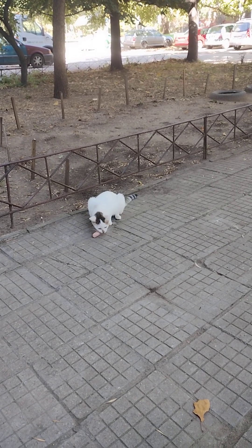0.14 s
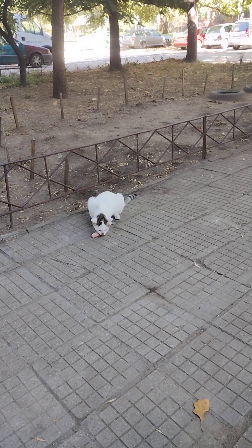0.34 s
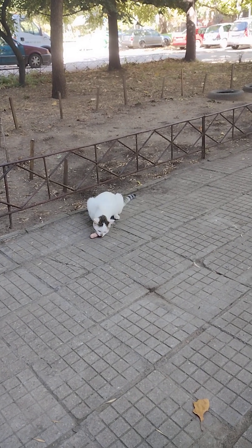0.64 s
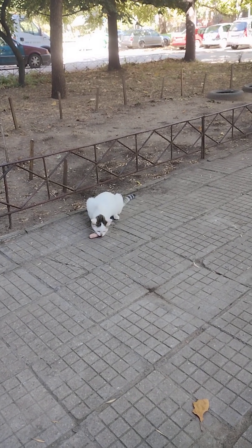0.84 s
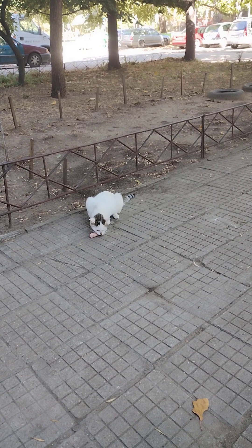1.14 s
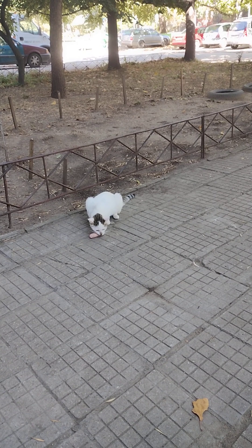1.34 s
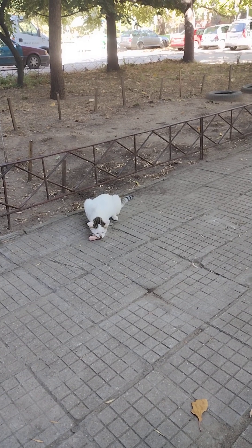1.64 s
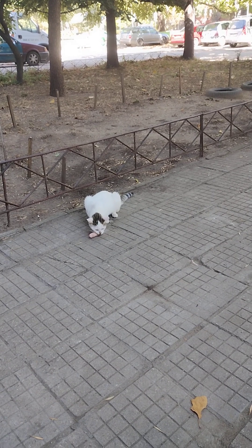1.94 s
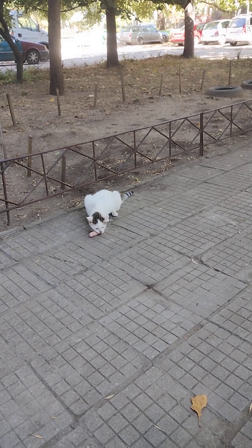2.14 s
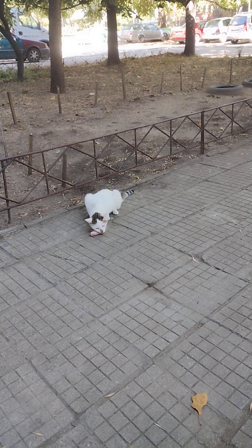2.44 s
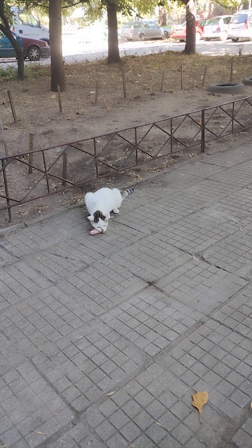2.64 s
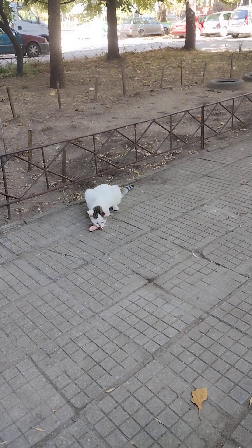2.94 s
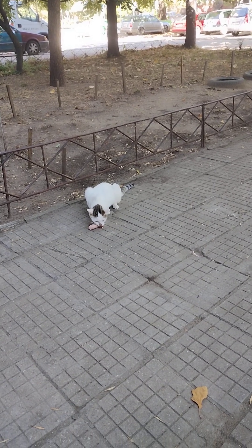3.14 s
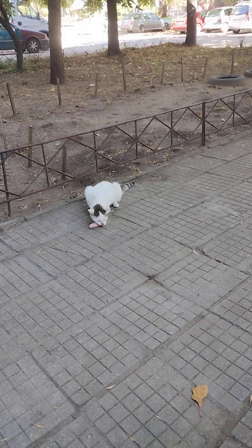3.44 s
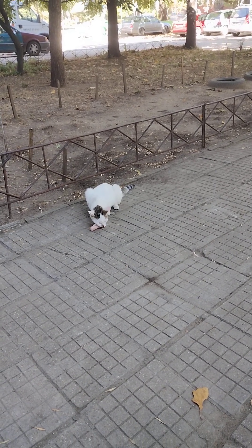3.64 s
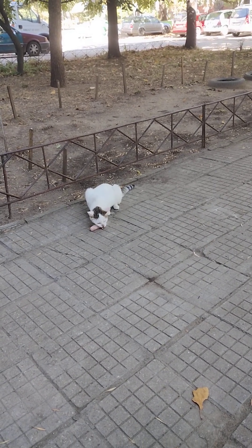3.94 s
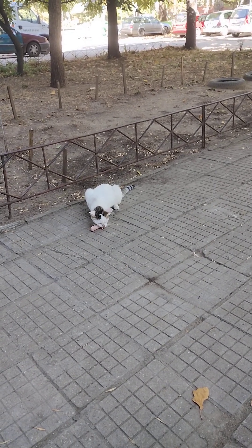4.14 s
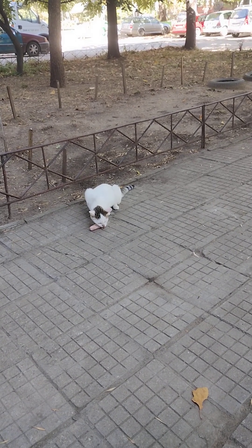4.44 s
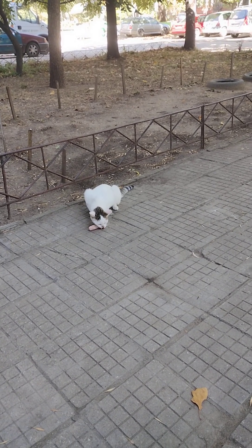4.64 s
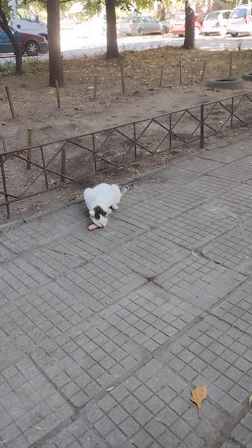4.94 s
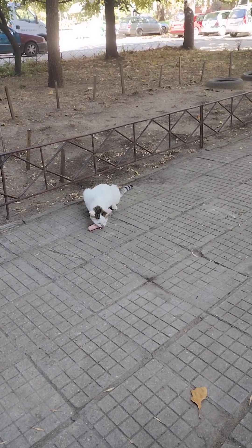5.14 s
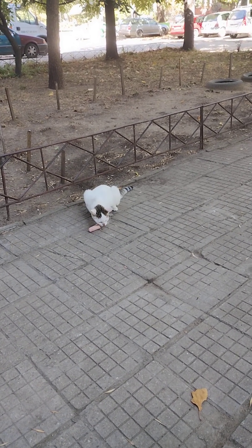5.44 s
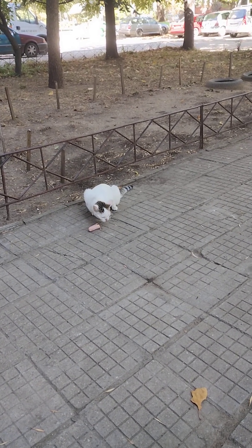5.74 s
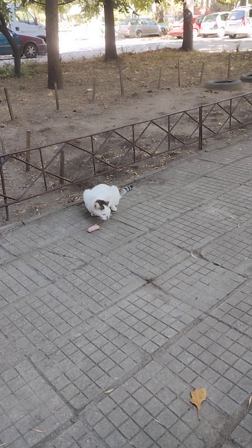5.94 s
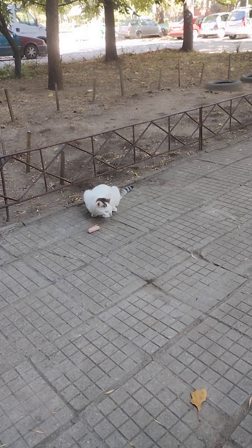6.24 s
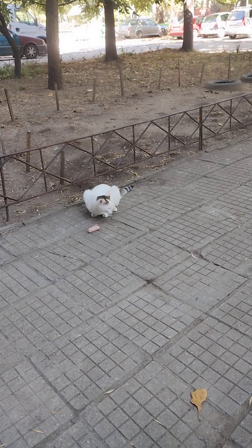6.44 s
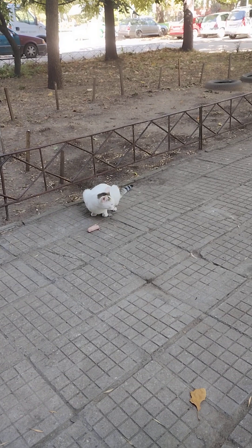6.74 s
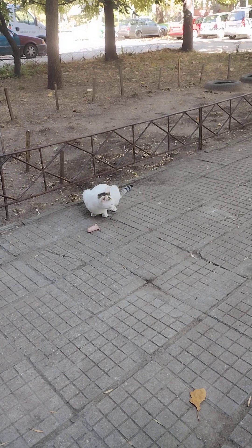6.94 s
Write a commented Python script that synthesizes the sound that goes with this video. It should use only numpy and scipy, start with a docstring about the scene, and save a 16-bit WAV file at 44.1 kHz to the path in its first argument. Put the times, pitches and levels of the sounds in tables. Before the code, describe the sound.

A city street heard outdoors from a pavement at some distance, in stereo, with constant low traffic rumble and soft tyre roar slightly to the right. At 0-0.45 s four quick raspy bird chirps sound, blurred by echo, while a far fluttering engine slows and dies away. A very faint tick comes near 1 s. From about 1.1 s a vehicle pulls away in one gear, its deep exhaust boom rising steadily and swelling through resonances until 5.4 s. A thin, faint falling whistle comes at 2.2 s and two close dull knocks at 2.6 s. From 3.3 s a second engine throbs softly. The first turns raspy and swishes past around 5.3 s, then fades. The second gathers speed, throbbing faster, with a thin whine near 6 s and rising tyre hiss to the end at about 7 s. Dry ticks click at 6.05-6.15 s; a stronger dull knock and gritty scuff land at 6.5 s.

```python
"""A city street heard from a pavement some way off, over steady traffic rumble and tyre roar.
Raspy bird chirps open it as a far engine dies away. One vehicle pulls away in one gear, its exhaust
harmonics booming through resonances; a thin whistle and two dull knocks fall meanwhile. A second engine
throbs in, the first rasps and swishes by, then the second gathers speed with a whine and rising hiss.
Dry ticks, a last knock and a gritty scuff come near the end. Noise is filtered, engines are harmonics."""
import sys
import numpy as np
from scipy import signal
from scipy.fft import rfft, irfft
from scipy.io import wavfile

SR = 44100
rng = np.random.default_rng(int(sys.argv[2]) if len(sys.argv) > 2 else 0)


def file_out(sig):
    """Save sig as 16-bit WAV at sys.argv[1]."""
    # one column per channel
    cols = np.atleast_2d(sig).T
    # limit, then scale
    lim = np.clip(cols, -1, 1)
    pcm = np.round(lim * 32767).astype(np.int16)
    wavfile.write(sys.argv[1], SR, pcm)


N = 313110
TIME = np.arange(N) / SR
FREQS = np.fft.rfftfreq(N, 1 / SR)


def undb(db):
    """Decibels to gain."""
    return 10 ** (np.asarray(db) / 20)


def unit(x):
    """Scale to rms 1."""
    return x / np.sqrt(np.mean(x ** 2))


def curves(table):
    """Columns of a table, joined by straight lines in time."""
    s, *columns = np.transpose(table)
    return [np.interp(TIME, s, c) for c in columns]


def colour(points, hz=FREQS):
    """Gain of a spectrum at the given frequencies, in dB over log frequency."""
    f, db = np.transpose(points)
    return undb(np.interp(np.log(hz + 1), np.log(f), db))


def walk(rate_hz):
    """Smooth random curve of rms 1 that changes at about this rate."""
    low_pass = 1 / (1 + (FREQS / rate_hz) ** 4)
    return unit(irfft(rfft(rng.standard_normal(N)) * low_pass, N))


def swell(start_s, end_s, db, rise_db_per_s=0, fall_db_per_s=0):
    """Gain that climbs to its level, holds from start to end and dies away."""
    below_db = rise_db_per_s * np.maximum(start_s - TIME, 0)
    past_db = fall_db_per_s * np.maximum(TIME - end_s, 0)
    return undb(db - below_db - past_db)


def pan(x, left_db):
    """Place a sound by its left minus right level."""
    return x * undb(np.array([[left_db], [-left_db]]) / 2)


def noise(points, alike_hz, gate=1):
    """Gated, then coloured stereo noise of rms 1; ports are alike well below alike_hz, unrelated above."""
    mid, side = rfft(gate * rng.standard_normal((2, N)))
    alike = np.exp(-(FREQS / alike_hz) ** 2)
    both = np.sqrt(1 + alike) * mid + np.sqrt(1 - alike) * side * np.array([[1], [-1]])
    return unit(irfft(both * colour(points), N))


def street(x, t60_s, wet_db):
    """Direct sound plus diffuse echoes from house fronts and trees, as decaying noise."""
    tail = rng.standard_normal((2, SR)) * undb(-60 * TIME[:SR] / t60_s)
    tail /= np.sqrt(np.sum(tail ** 2, axis=1, keepdims=True))
    wet = signal.fftconvolve(x[None], tail, axes=1)[:, :N]
    return (x + undb(wet_db) * wet) / np.sqrt(1 + undb(2 * wet_db))


def turn(hz, jitter):
    """Firing phase of an engine whose speed is slightly unsteady."""
    return 2 * np.pi * np.cumsum(hz * (1 + jitter * walk(12.5))) / SR


def harmonic(phase, order, flutter, flutter_hz=9):
    """A line locked to the phase, steady part of rms 1; scattered paths make it flutter."""
    scatter = 1 + flutter * (walk(flutter_hz) + 1j * walk(flutter_hz))
    return np.sqrt(2) * np.real(scatter * np.exp(1j * order * phase))


def engine(speed, orders, flutter):
    """An engine of rms 1: fluttering harmonics of its firing rate."""
    phase = turn(curves(speed)[0], jitter=0.01111)
    return unit(sum(undb(db) * harmonic(phase, k, flutter) for k, db in orders))


# spectra of far rumble, tyre roar, far engine's tyres: (frequency [Hz], level [dB])
RUMBLE_COLOUR = [(20, -30.5), (32, -35), (46, -6.5), (70, 1), (100, 1.5), (170, 0.5), (215, -4),
                 (260, -4.5), (340, -9.5), (480, -15.5), (700, -27.5), (1500, -55)]
ROAR_COLOUR = [(100, -21), (300, -9), (500, -4.5), (700, -5), (950, 0), (1300, -1.5), (1600, -2),
               (2200, -7), (2800, -13.5), (3400, -22), (5000, -30.5), (8000, -39), (11000, -57.5),
               (14000, -62)]
LEAVING_COLOUR = [(300, -16), (550, -8), (780, 4), (1100, -1.5), (2200, -8.5), (3200, -24.5), (4700, -30.5),
                  (8000, -40), (14000, -49)]
# rumble: (time [s], level [dB])
RUMBLE_LEVEL = [(0, -36), (1.2, -36), (2.8, -39.5), (4.5, -34), (5.6, -39), (7.1, -35)]
# swell of the far engine's tyres: hold [s], level [dB], fall [dB/s]
LEAVING_SWELL = dict(start_s=0, end_s=0.17, db=-43, fall_db_per_s=7)


def traffic():
    """Many far engines merge to a rumble, tyres to a slowly ebbing roar further to the right."""
    rumble_db = curves(RUMBLE_LEVEL)[0] + 0.29 * walk(3.6)
    rumble = noise(RUMBLE_COLOUR, alike_hz=1490) * undb(rumble_db)
    roar_start_db, ebb_db_per_s = -41, 0.14
    roar_db = roar_start_db - ebb_db_per_s * TIME + 0.44 * walk(26.0)
    roar = noise(ROAR_COLOUR, alike_hz=920) * undb(roar_db)
    leaving = noise(LEAVING_COLOUR, alike_hz=900) * swell(**LEAVING_SWELL)
    return pan(rumble, left_db=-2.05) + pan(roar + leaving, left_db=-3.5)


# far engine, slowing: (time [s], firing rate [Hz])
DRONE_SPEED = [(0, 64.3), (.8, 60.8)]
# its harmonics: (multiple of firing rate, relative level [dB])
DRONE_ORDERS = [(1, 0.5), (2, -9), (3, -12), (4, -5), (5, -14), (6, -15.5)]
# its swell: hold [s], level [dB], fall [dB/s]
DRONE_SWELL = dict(start_s=0, end_s=0.22, db=-36.5, fall_db_per_s=14)


def far_engine():
    """Strongly fluttering harmonics of a slowing engine die away."""
    return engine(DRONE_SPEED, DRONE_ORDERS, flutter=0.97) * swell(**DRONE_SWELL)


def arch(s, length_s):
    """Rounded envelope of one bird note."""
    return np.sqrt(np.maximum(0, 1 - (2 * (TIME - s) / length_s - 1) ** 2))


# raspy chirps: (time [s], length [s], level [dB])
CHIRPS = [(0.04, 0.11, -57), (0.205, 0.075, -55), (0.29, 0.055, -61), (0.363, 0.086, -53)]
# chirp spectrum: (frequency [Hz], level [dB])
CHIRP_COLOUR = [(2500, -21), (4000, -11), (4950, -3), (5300, -14), (5650, -3), (6000, -16), (6650, 3),
                (7080, -3.5), (7400, -22), (8300, -19), (9000, -23), (10800, -21), (14000, -44)]
# thin whistle: (time [s], pitch [Hz])
WHISTLE = [(2.22, 7800), (2.309, 7800), (2.42, 7200)]


def birds():
    """Chirps of gated noise and a falling sine whistle, blurred by the trees."""
    gate = sum(undb(db) * arch(s, length_s) for s, length_s, db in CHIRPS)
    chirps = street(noise(CHIRP_COLOUR, alike_hz=900)[0] * gate, t60_s=1.5, wet_db=5.5)
    start_s, end_s = WHISTLE[0][0], WHISTLE[-1][0]
    hz = curves(WHISTLE)[0] * (1 + 0.013 * walk(220))
    tone = np.sqrt(2) * np.sin(2 * np.pi * np.cumsum(hz) / SR)
    whistle = undb(-66.5) * arch(start_s, end_s - start_s) * tone
    return pan(chirps, left_db=-1.5) + pan(street(whistle, t60_s=1.3, wet_db=7), left_db=-0.5)


# dull knocks: (time [s], ring frequency [Hz], t60 [s], level [dB])
KNOCKS = [(2.593, 615, .1, -35.5), (2.618, 640, .14, -39), (6.486, 312, .1, -20.5)]
# panel modes: (multiple of ring frequency, relative level [dB])
KNOCK_MODES = [(.55, -13.5), (.8, -9.5), (.93, 0), (1.06, -0.5), (1.23, -9.5), (1.4, -16.5)]


def knocks():
    """Far, dull blows such as a car door: a soft contact rings a few low panel modes."""
    out = np.zeros(N)
    contact_s = 0.0038
    for s, hz, t60_s, db in KNOCKS:
        age = np.maximum(TIME - s, 0)
        ring = sum(undb(mode_db) * np.sin(2 * np.pi * hz * ratio * age) for ratio, mode_db in KNOCK_MODES)
        out += ring * (1 - np.exp(-age / contact_s)) * undb(db - 60 * age / t60_s)
    return street(out, t60_s=0.3, wet_db=-8.5)


# small sharp ticks: (time [s], pitch [Hz], t60 [s], level [dB])
TICKS = [(.981, 14000, .1, -63), (6.057, 1900, .04, -38.5), (6.080, 1600, .05, -43),
         (6.129, 1900, .05, -44), (6.5, 4300, .05, -52)]
# tick spectrum: (multiple of pitch, level [dB])
TICK_COLOUR = [(.3, -28), (.65, -6), (1, 0), (1.4, -7), (2.5, -40)]


def ticks():
    """Short dry noise bursts, as of a twig or leaf on the paving."""
    out = 0
    attack_s = .0015
    for s, hz, t60_s, db in TICKS:
        burst = noise([(hz * ratio, level_db) for ratio, level_db in TICK_COLOUR], alike_hz=9000)
        attack = np.clip((TIME - s) / attack_s, 0, 1)
        out = out + burst * attack * undb(db - 60 * abs(TIME - s) / t60_s)
    return out


def whine():
    """A thin, unsteady belt whine of rms 1 at one port."""
    hz = 3115 * (1 + .012 * walk(300) + .003 * walk(3))
    return unit(harmonic(2 * np.pi * np.cumsum(hz) / SR, order=1, flutter=0.26))


# spectra of first vehicle's tyres and air, second's tyres, gritty scuff: (frequency [Hz], level [dB])
PASS_COLOUR = [(1500, -13.5), (3000, 5.5), (3900, 1.5), (4650, 1), (5300, -6.5), (6100, -3), (6700, -6.5),
               (7400, -10), (8500, -8.5), (9100, -14), (9800, -10.5), (11000, -24), (14000, -31)]
NEAR_COLOUR = [(1500, -7), (2700, 5), (3200, 5.5), (3450, 3.5), (3750, 5.5), (4200, -5), (4650, -7),
               (5300, -6), (6100, -3.5), (7400, -19.5), (8200, -16.5), (9700, -17), (11000, -30.5),
               (14000, -28.5)]
SCUFF_COLOUR = [(2000, -3), (3300, 0), (3700, -1), (4000, -10), (4270, 5), (4700, -12), (5500, -7),
                (6100, -7), (7200, -22), (14000, -35)]
# swells of these and of the belt whine: hold [s], level [dB], rise and fall [dB/s]
PASS_SWELL = dict(start_s=5.29, end_s=5.32, db=-53, rise_db_per_s=9, fall_db_per_s=18)
NEAR_SWELL = dict(start_s=7.46, end_s=7.1, db=-48, rise_db_per_s=7.5)
SCUFF_SWELL = dict(start_s=6.48, end_s=6.7, db=-57.5, rise_db_per_s=300, fall_db_per_s=14)
WHINE_SWELL = dict(start_s=5.9, end_s=6.3, db=-59.5, rise_db_per_s=5.5, fall_db_per_s=6)


def hiss():
    """Tyre noise: the first vehicle swishes by; the second nears with a belt whine and a sudden scuff."""
    passing = noise(PASS_COLOUR, alike_hz=900) * swell(**PASS_SWELL) * undb(0.4 * walk(11))
    nearing = noise(NEAR_COLOUR, alike_hz=900) * swell(**NEAR_SWELL) * undb(walk(18))
    scuff = noise(SCUFF_COLOUR, alike_hz=900) * swell(**SCUFF_SWELL) * undb(2.5 * walk(35))
    belt = np.array([whine(), whine()]) * swell(**WHINE_SWELL)
    return pan(passing + nearing + scuff + belt, left_db=-2.5)


# coasting, then gathering speed: (time [s], firing rate [Hz], level [dB], throb rate [Hz])
SECOND_SPEED = [(3.3, 72.75, -50, 3.7), (4.2, 71.1, -43.5, 3.7), (5.3, 68.46, -46, 3.71),
                (6.1, 69, -39.5, 4.1), (6.5, 70.35, -36.5, 5.15), (7.1, 75.7, -37, 5.6)]
# its harmonics: (multiple of firing rate, relative level [dB])
SECOND_ORDERS = [(1, -9.5), (2, 2), (3, -25.5), (4, -7), (5, -24.5), (6, -16), (7, -23), (9, -21)]


def second_engine():
    """The second engine's harmonics throb, faster as it gathers speed."""
    _, db, throb_hz = curves(SECOND_SPEED)
    crest_s, depth = 6.01, .55
    cycles = np.cumsum(throb_hz) / SR
    from_crest = cycles - np.interp(crest_s, TIME, cycles)
    throb = 1 + depth * np.cos(2 * np.pi * from_crest)
    return engine(SECOND_SPEED, SECOND_ORDERS, flutter=0.22) * throb * undb(db)


# exhaust and street resonances: (centre [Hz], width [Hz], peak gain [dB])
BOOM_MODES = [(64.9, 4.3, -34.5), (70.3, 2.3, -33.5), (73, 1.5, -27), (76.3, 2.9, -24.5), (81.5, 3.33, -25),
              (84.35, 0.71, -32), (87.16, 1.2, -30), (92.5, 4.6, -35.5), (99.3, 3, -39),
              (126.5, 7.5, -36.5), (133.2, 4.7, -30), (138.9, 3.8, -30), (145.3, 4.1, -34.5),
              (163.5, 5.3, -34), (171.6, 1.8, -31), (174.14, 2.4, -22), (177.6, 1.5, -28.5),
              (181.2, 2.2, -23.5), (184, 2.2, -28), (187.9, 2.8, -30), (192.46, 3.27, -27),
              (198.7, 1.3, -35), (203.6, 7, -38.5), (210.1, 4, -38.5), (252.4, 18, -44.5)]


def resonance(hz):
    """Summed gain of the booming resonances for a line at this frequency."""
    return sum(undb(db) / (1 + (2 * (hz - centre) / width) ** 2) for centre, width, db in BOOM_MODES)


# first vehicle: (time [s], firing rate [Hz])
SPEED = [(1.0, 61.5), (1.6, 66.3), (2.8, 79.1), (4.0, 91.1), (5.5, 104.2)]
# spectra of exhaust rasp and load shudder: (frequency [Hz], level [dB])
RASP_COLOUR = [(150, -5.5), (260, -1.5), (300, -10.5), (345, -8.5), (385, 2), (420, -3), (465, -0.5),
               (560, -14.5), (800, -9)]
SHUDDER_COLOUR = [(15, -27), (32, -12), (46, 5), (60, 1.5), (120, 9.5), (180, 3.5), (260, -1.5),
                  (600, -53.5)]
# swells: hold [s], level [dB], rise and fall [dB/s]; throttle scales the whole boom
THROTTLE = dict(start_s=1.12, end_s=5.38, db=0, rise_db_per_s=70, fall_db_per_s=45)
THIRD_SWELL = dict(start_s=1.52, end_s=3.25, db=1.2, rise_db_per_s=55, fall_db_per_s=30)
FOURTH_SWELL = dict(start_s=1.6, end_s=1.64, db=-46.5, rise_db_per_s=70, fall_db_per_s=30)
SHUDDER_SWELL = dict(start_s=1.3, end_s=3.26, db=-35.5, rise_db_per_s=65, fall_db_per_s=5.5)
# rasp coming into the open, and its fade: the two gains multiply
RASP_SWELL = dict(start_s=4.83, end_s=4.94, db=-44, rise_db_per_s=4.5, fall_db_per_s=4.5)
RASP_FADE = dict(start_s=1.4, end_s=5.53, db=1, rise_db_per_s=72, fall_db_per_s=6)


def accelerating():
    """Exhaust harmonics boom across resonances, half orders rasp, gas puffs shudder with each firing."""
    hz = curves(SPEED)[0]
    phase = turn(hz, jitter=.002)
    first, second, third = (
        resonance(k * hz) * harmonic(phase, k, flutter=.09, flutter_hz=14) for k in (1, 2, 3))
    fourth = harmonic(phase, 4, flutter=0.57) * swell(**FOURTH_SWELL)
    boom = first + second + third * swell(**THIRD_SWELL) + fourth

    half_db = -1.5  # unequal cylinders sound between the firing harmonics
    rasp = 0
    for k in np.arange(5, 15) / 2:
        # the higher the order, the rougher and wider its line
        line = unit(harmonic(phase, k, flutter=.12 * k, flutter_hz=3 * k))
        rasp = rasp + undb(half_db * (2 * k % 2)) * colour(RASP_COLOUR, k * hz) * line
    rasp = unit(rasp) * swell(**RASP_FADE) * swell(**RASP_SWELL)

    puffs = 1 + .7 * np.sin(phase)
    shudder = noise(SHUDDER_COLOUR, alike_hz=1500, gate=puffs) * swell(**SHUDDER_SWELL)
    return swell(**THROTTLE) * boom + rasp + pan(shudder, left_db=-4.5)


def scene():
    """Everything that reaches the pavement."""
    background = traffic() + far_engine() + birds() + knocks() + ticks()
    return background + hiss() + second_engine() + accelerating()


# balance of the two ports: (frequency [Hz], left minus right [dB])
PORTS = [(40, -2.8), (80, -2.4), (150, -.3), (1500, -.3), (2600, 1), (4500, 3.3), (13000, 3.3)]


def record(dry):
    """The left port is thinner in the bass and brighter on top; the highest treble is cut."""
    lean = np.sqrt(colour(PORTS))
    top_hz = 14250
    low_pass = 1 / (1 + (FREQS / top_hz) ** 400)
    return irfft(rfft(dry) * np.array([lean, 1 / lean]) * low_pass, N)


dry = scene()
out = record(dry)
file_out(out)
```